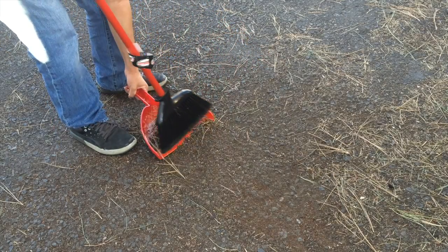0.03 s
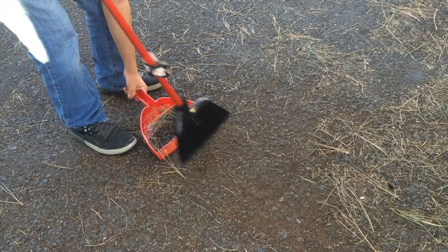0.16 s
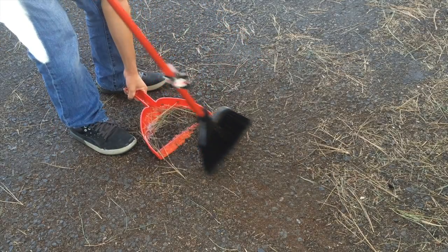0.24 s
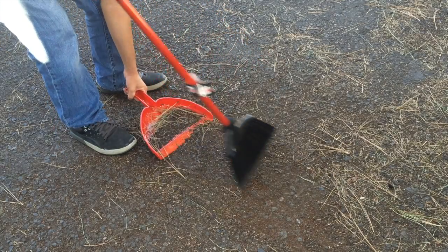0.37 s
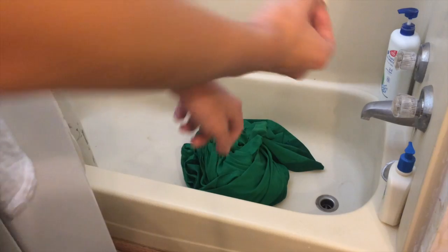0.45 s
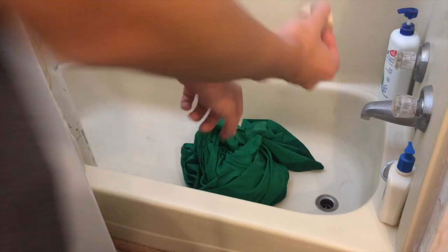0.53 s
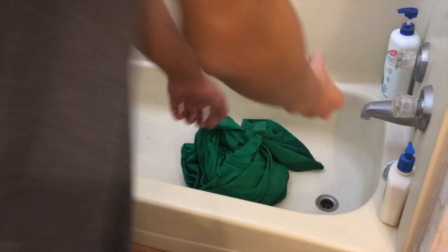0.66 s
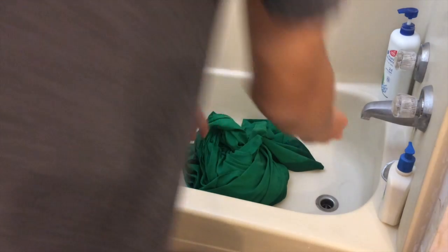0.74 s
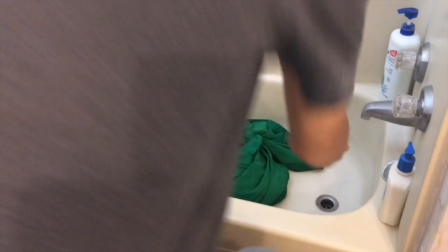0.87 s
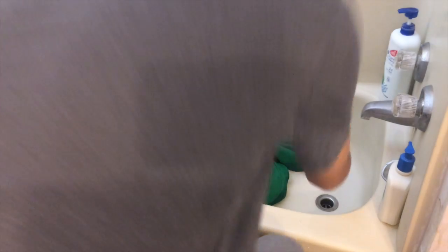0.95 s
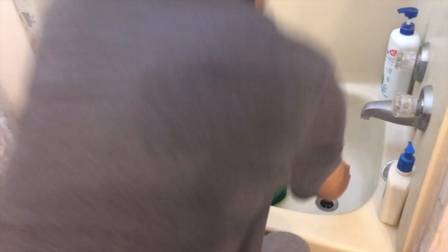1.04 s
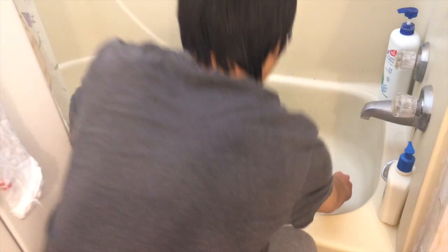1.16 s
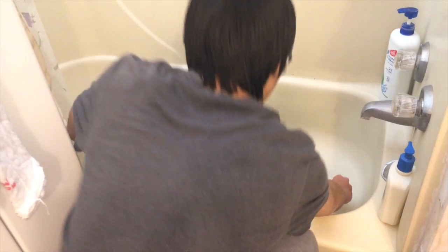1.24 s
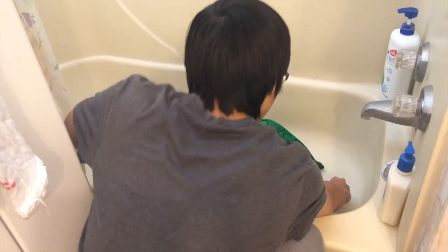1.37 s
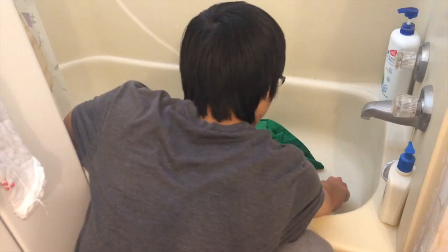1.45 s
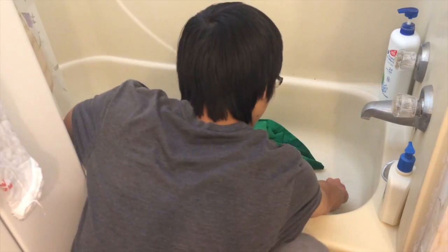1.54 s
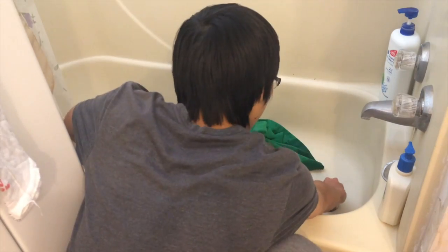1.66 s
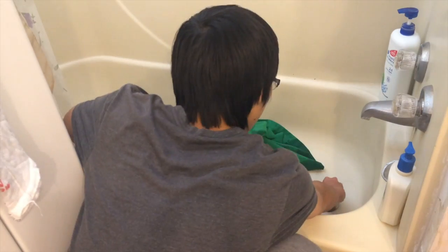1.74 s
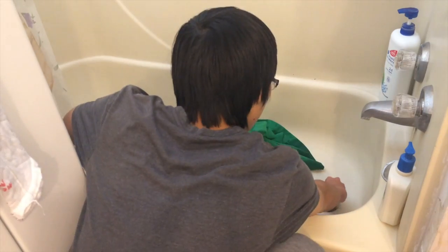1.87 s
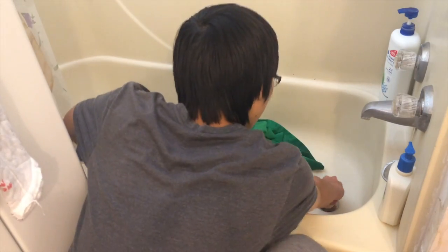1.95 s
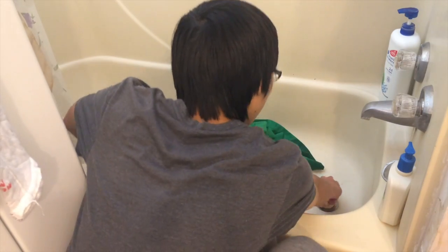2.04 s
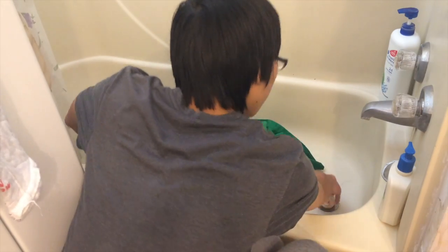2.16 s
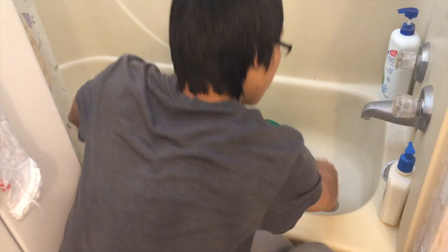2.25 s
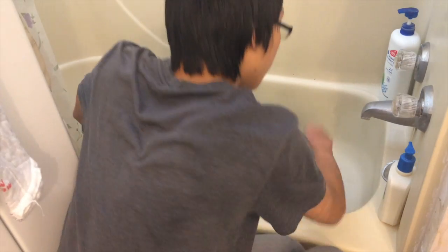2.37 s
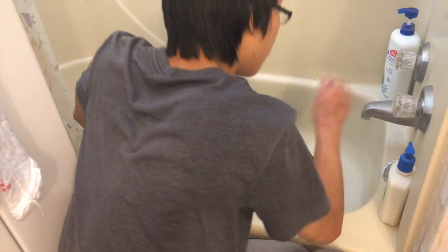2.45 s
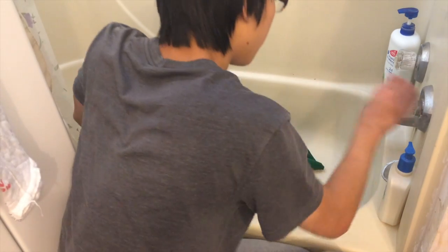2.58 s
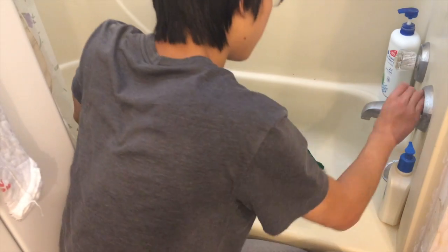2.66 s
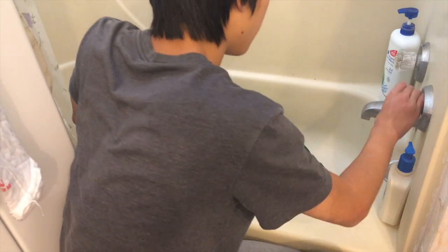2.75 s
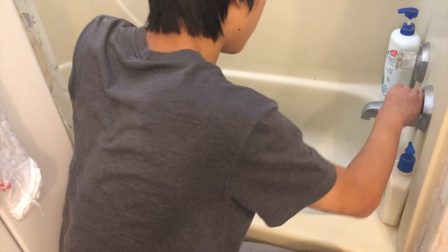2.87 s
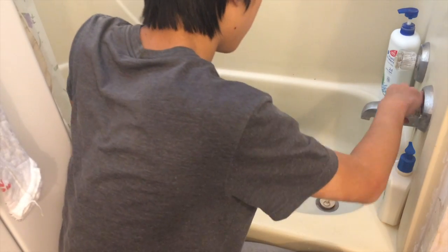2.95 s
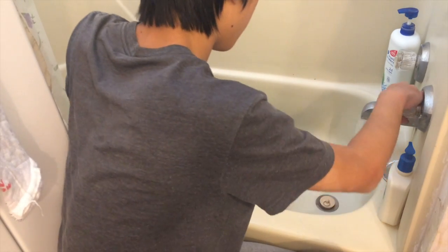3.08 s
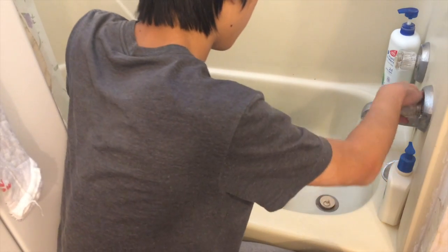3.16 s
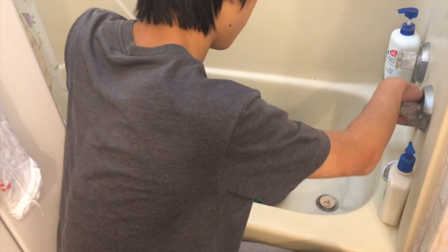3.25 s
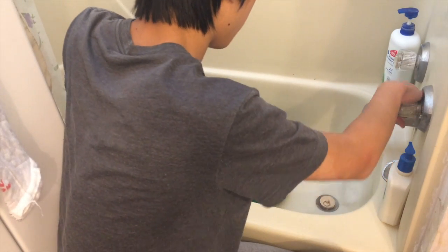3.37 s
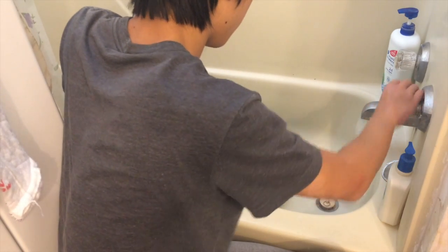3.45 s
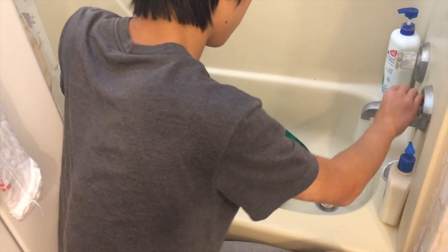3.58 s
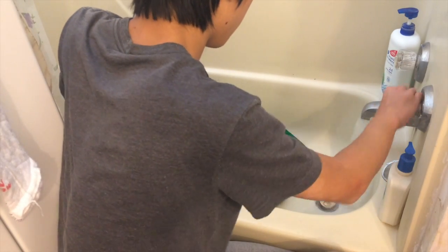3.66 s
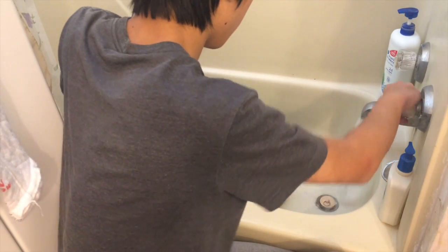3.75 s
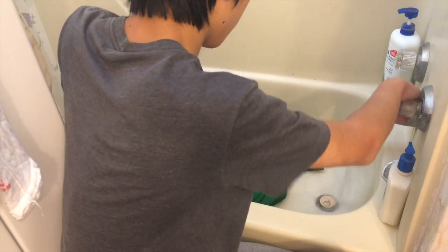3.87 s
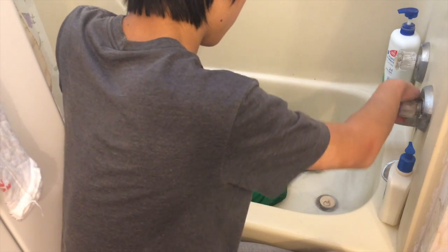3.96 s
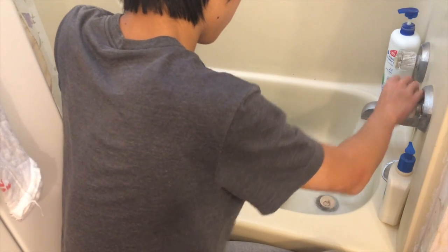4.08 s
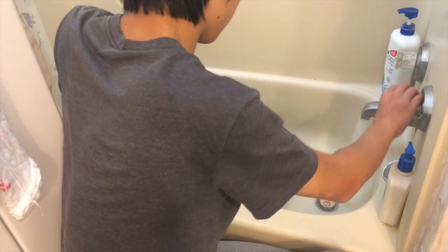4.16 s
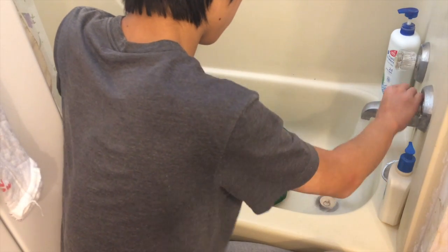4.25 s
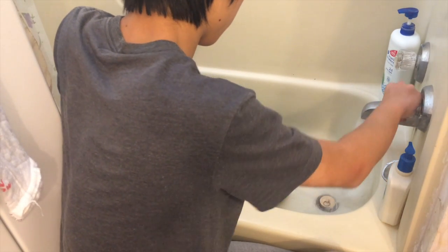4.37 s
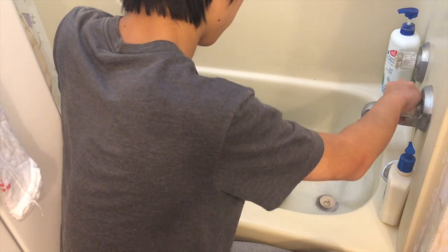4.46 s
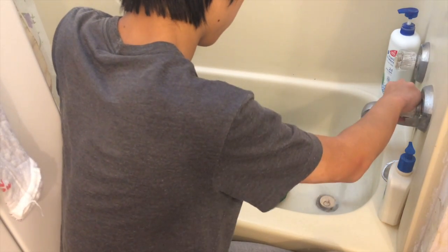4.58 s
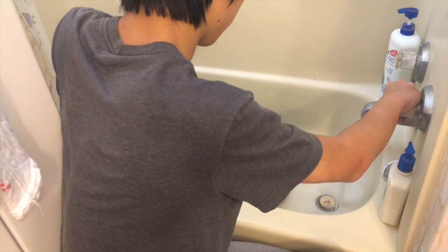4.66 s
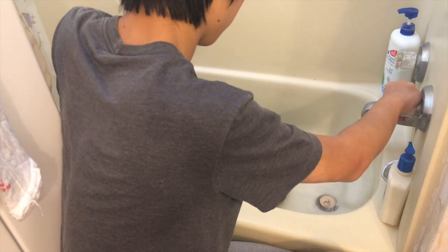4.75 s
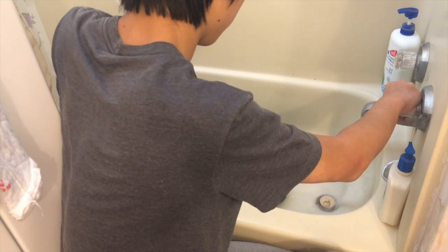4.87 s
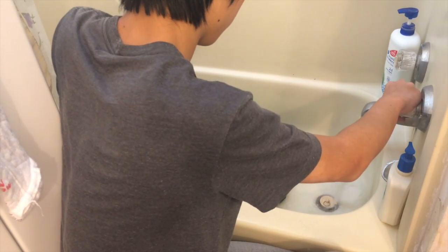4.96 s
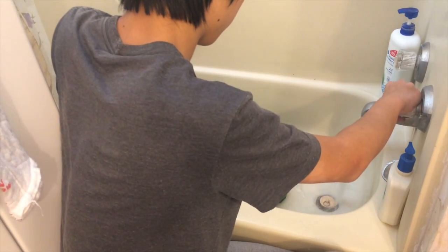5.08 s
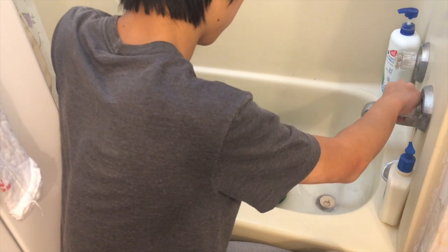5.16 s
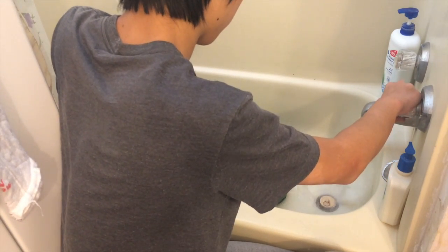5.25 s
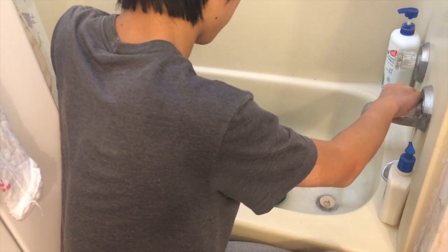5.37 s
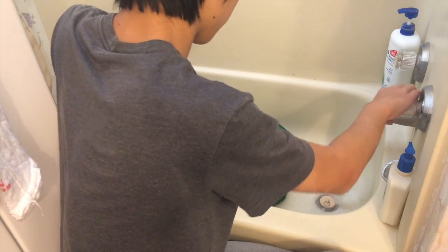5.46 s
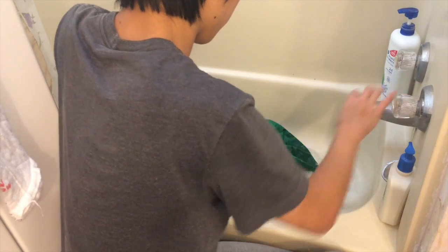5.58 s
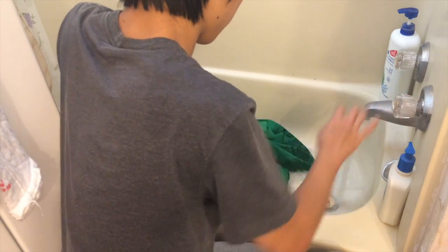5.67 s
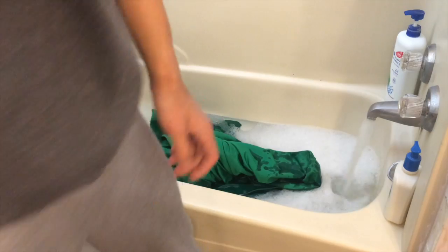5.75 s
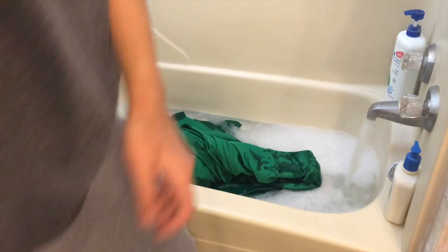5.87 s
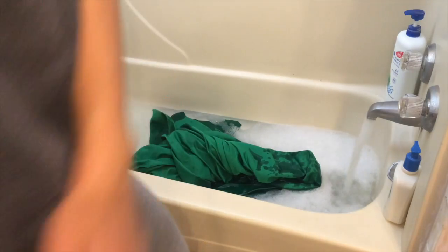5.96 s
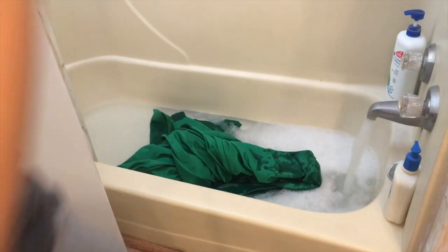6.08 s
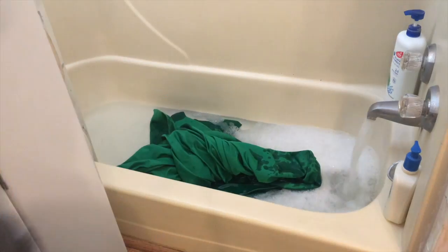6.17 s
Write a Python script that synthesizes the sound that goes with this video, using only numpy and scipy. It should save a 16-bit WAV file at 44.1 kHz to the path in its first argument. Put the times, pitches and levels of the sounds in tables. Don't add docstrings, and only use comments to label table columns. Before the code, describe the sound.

After a last broom scrape outdoors, a tub plug snaps sharply, then a tap hisses, whines, coughs air and gushes before softening into foam.

```python
import sys
import numpy as np
from scipy import signal
from scipy.fft import rfft
from scipy.io import wavfile
from scipy.ndimage import uniform_filter1d

SR = 44100
rng = np.random.default_rng(int(sys.argv[2]) if len(sys.argv) > 2 else 0)


def nominal_scale(level):
    x = np.asarray(level, float) / 20
    return 10 ** x


def unload_wav(signal):
    wavfile.write(
        sys.argv[1],
        SR,
        np.round(np.clip(np.atleast_2d(signal).T, -1, 1) * 32767).astype(np.int16),
    )


N = 274302
T = np.arange(N) / SR

INDOORS_S, HALF_FULL_S = .488, 5.787
YARD_DB, ROOM_DB = -49.5, -59.5
PLUG_S, PLUG_DB, PLUG_HZ = 1.5176, -10, 1720
CRACK_S, WIDE_S = 2.866, 3.74
WHINE_HZ, WHINE_CLIMB_HZ_PER_S = 1393, 167
BURST_S = .0036
JET_HZ, JET_CLIMB_HZ_PER_S = 6130, 3700
HISS_DB, LIFT_DB, LIFT_S, WIDE_DB, WIDENING_S = -36, -41, 0.036, -14.5, 0.048
EMPTY_HZ, FULL_HZ, FILL_S = 600, 462.4, .035
LANDS_S, STREAM_DB = 3.325, -37.5
TRICKLE_DB, BOOM_DB, SHALLOW_DB, DEEPEN_S, CUSHION_DB_PER_S = -56, -40.5, -11.5, 0.58, -2
WALLS_DB = -43.5
SUDS_DB, POUR_DB = -62, -47.5

# frequency in Hz, density in dB per Hz.
YARD_COLOUR = [(18, -47), (30, -17), (102, -1.5), (320, -22), (364, -12.5), (415, -19), (978, -21),
               (2370, -39.5), (15000, -52)]
# frequency in Hz, density in dB per Hz.
SCRAPE_COLOUR = [(800, 3.0), (2000, 2), (6000, -10.5), (15000, -24)]
# start in seconds, peak level in dB, pitch in Hz.
BRISTLES = [
    (.0095, -48, 6500),
    (0.0317, -33, 1640),
    (0.0345, -34, 1500),
    (.0645, -44, 3200),
    (0.084, -38, 3420),
    (.107, -50, 4500),
    (.112, -45, 4400),
    (.124, -50, 3200),
    (0.186, -37, 1800),
    (.2065, -51, 3100),
]
# time in seconds, scrape level in dB.
SWEEP = [(.004, -56), (.03, -62), (.033, -51.5), (.055, -57.5), (0.125, -60), (0.14, -70), (0.185, -70),
         (0.188, -46), (0.194, -71), (0.24, -76)]
# frequency in Hz, density in dB per Hz.
ROOM_COLOUR = [(15, -37), (25, -28), (54, 1.5), (96, -6), (128, -0.5), (244, -6), (441, -8), (659, -15),
               (754, -14), (1040, -19.5), (1320, -17), (1980, -21.5), (2880, -22.5), (15200, -35.5)]
# frequency in Hz, density in dB per Hz.
CLOTH_COLOUR = [(200, -3.5), (450, -5), (1200, -7), (2500, -16), (5000, -21.5), (8000, -24), (15300, -49)]
# peak in seconds, level in dB, swell, t60 and hold in seconds.
RUSTLES = [(.493, -53, .004, 0.8, 0.015), (.5, -55.5, .01, 0.31, 0.17), (1.0, -62.5, 0.51, 1.4, 0.23),
           (1.012, -48, .012, .22, .0), (1.505, -49.5, .008, .35, 0.025), (1.679, -50, 0.057, 0.4, .0),
           (2.349, -68, .12, .4, 0.017), (2.517, -63, 0.14, 1.8, 0.0025), (2.72, -59, 0.24, 0.35, .0),
           (2.749, -55, 0.036, 0.26, .0), (2.83, -60, .04, .3, 0.058)]
# frequency in Hz, width in Hz, level in dB.
SHELL = [(102.4, 5.7, -6.5), (167, 26.4, 4), (315.7, 6.8, 0), (425, 65, 0), (468, 10, -9),
         (671.6, 7.5, -2.5), (983, 22, -6)]
# peak in seconds, level in dB, swell and t60 in seconds.
RUBS = [(.498, -48, .008, 0.46), (.774, -58, .04, .12), (1.012, -55.5, 0.18, 1.2), (1.422, -43, 0.012, 0.2),
        (1.47, -47, .03, 0.44), (1.505, -42, .007, .05), (1.647, -46.5, 0.021, 0.91),
        (2.237, -51, 0.016, 0.048), (2.279, -57, .02, 0.12), (2.715, -64, 0.29, .4),
        (2.749, -47, 0.041, 0.29)]
# start in seconds, peak level in dB, pitch in Hz, t60 in seconds.
BUMPS = [(.54, -59, 45, 0.18), (1.011, -37.5, 47, 0.068), (1.195, -38.5, 179, 0.061),
         (1.25, -49.5, 173, 0.14), (1.421, -30, 430, 0.038), (1.433, -34, 316, 0.059),
         (1.456, -31.5, 162, 0.058), (1.472, -38, 76, 0.16), (1.516, -38, 100, 0.069),
         (1.531, -38, 434, 0.048), (1.643, -32.5, 405, 0.052), (1.654, -31.5, 263, 0.063),
         (1.675, -30.5, 191, 0.065), (1.702, -34.5, 210, 0.04), (1.731, -47, 254, .05),
         (1.755, -33.5, 184, 0.066), (2.722, -38, 152, 0.058), (2.74, -47, 303, 0.064),
         (2.745, -48, 520, .07), (2.749, -45, 172, .1)]
# start in seconds, peak level in dB, body pitch in Hz, edge level in dB.
TICKS = [(.490, -54, 2300, -54), (1.007, -50, 1980, -54), (1.423, -56, 2500, -63), (1.642, -52, 1300, -62),
         (2.740, -57, 2000, -48), (4.034, -29.5, 2330, -38), (4.13, -29, 2300, -40), (5.97, -62, 3000, -50),
         (6.038, -49, 4480, -39), (6.112, -57, 5500, -41), (6.205, -58, 5007, -40)]
# frequency in Hz, level in dB, t60 in seconds.
PLUG_RING = [(805, -25, 0.18), (980, -12, 0.076), (1110, -15, 0.092), (1297, 1, 0.12), (1505, 0, 0.17),
             (1480, -11, 0.11), (1809, -22, 0.1), (2110, 6.5, 0.073), (2283, -4, 0.1), (2480, -8, 0.1),
             (3270, -5.5, 0.065), (4400, -13.5, 0.083)]
# frequency in Hz, density in dB per Hz.
HISS_COLOUR = [(410, -7.5), (700, -9), (1200, -13.5), (1400, 0), (1620, -8.5), (1990, -16), (2200, -19),
               (2380, -23), (2780, -23), (3690, -16), (4830, -18), (7490, -13), (15200, -31)]
# frequency in Hz, width in Hz, level in dB.
PIPE = [(2470, 110, 5.5), (2990, 60, 2.5), (3690, 36, 0), (4110, 45, -1), (4590, 30, -12), (5290, 120, -4),
        (6250, 100, 3), (6610, 28, 3), (7290, 41, -2.5), (7800, 65, 0), (8030, 50, -2), (8660, 150, -4)]
# time in seconds, whine level in dB.
WHINE_LEVEL = [(2.86, -66), (2.9, -50), (2.94, -42), (3.014, -31.5), (3.09, -21.5), (3.25, -25.5),
               (3.65, -18), (3.72, -25), (3.77, -27), (3.856, -31), (4.0, -41)]
# frequency in Hz, width in Hz, level in dB.
SIDE_PIPES = [(1728, 20, 3.5), (1922, 9.5, -1)]
# peak in seconds, peak level in dB, pitch in Hz.
WHINE_BURSTS = [(3.06, -22.4, 1430), (3.0745, -23.9, 1420), (3.0863, -23.0, 1400), (3.1175, -35, 1460),
                (3.1287, -27, 1440), (3.1387, -24.9, 1450), (3.1468, -25, 1431), (3.1628, -24, 1410),
                (3.1783, -26, 1410), (3.1931, -27, 1410), (3.2011, -23.8, 1452), (3.2148, -22, 1425),
                (3.234, -27.3, 1499), (3.2416, -22, 1470), (3.249, -22, 1409), (3.2707, -20, 1440),
                (3.2829, -18, 1429), (3.2988, -21, 1470), (3.3077, -24, 1380), (3.3183, -18.5, 1420),
                (3.3451, -24, 1500), (3.3596, -18.6, 1439), (3.3702, -22.0, 1440), (3.3822, -23, 1494),
                (3.3979, -19.5, 1440), (3.413, -17, 1475), (3.4258, -19.1, 1500), (3.435, -17.2, 1430),
                (3.4449, -18, 1430), (3.456, -27, 1564), (3.4672, -17, 1456), (3.4772, -15.5, 1460),
                (3.4854, -16.5, 1432), (3.5029, -23.4, 1566), (3.5206, -16.5, 1502), (3.534, -22.3, 1510),
                (3.5406, -24.5, 1498), (3.554, -22, 1610), (3.5703, -19.5, 1574), (3.5785, -18.5, 1526),
                (3.5953, -19, 1505), (3.6158, -22, 1543), (3.6231, -19, 1519), (3.6346, -24, 1600),
                (3.6454, -19.9, 1491), (3.6537, -19.8, 1509), (3.664, -19.5, 1511), (3.676, -13.7, 1496),
                (3.6836, -14, 1469), (3.6986, -13.5, 1480), (3.712, -20.5, 1472), (3.7274, -26.7, 1470),
                (3.7396, -25.0, 1541), (3.751, -12, 1530), (3.7701, -22, 1510), (3.7778, -27, 1519),
                (3.7897, -25, 1586), (3.81, -24, 1530)]
# start in seconds, peak level in dB, pitch in Hz, t60 in seconds.
KNOCKS = [
    (2.865, -48, 1494, 0.25),
    (2.865, -50, 745, 0.091),
    (2.9632, -19, 587, 0.044),
    (2.9632, -28, 498, 0.067),
    (2.9632, -36, 840, 0.026),
    (2.9634, -37, 340, 0.071),
    (2.974, -29, 600, 0.08),
    (3.07, -35, 325, .12),
    (3.066, -39, 680, .08),
]
# peak in seconds, level in dB, swell, t60 and hold in seconds.
COUGHS = [
    (2.985, -35.5, 0.012, 0.17, 0.017),
    (3.049, -30.5, 0.012, 0.11, 0.038),
    (3.118, -40, .012, 0.15, 0.015),
    (3.354, -39.5, 0.022, 0.18, 0.024),
    (3.686, -38.5, .02, 0.19, 0.022),
    (3.75, -42, .015, .2, 0.013),
]
# peak in seconds, level in dB, swell, t60 and hold in seconds.
WHOOSH = (2.925, -42, .04, .7, .12)
# frequency in Hz, density in dB per Hz.
WHOOSH_COLOUR = [(1500, -25), (2500, -2), (3400, -8), (4200, 2), (4700, -6), (5300, -5), (7000, -30)]
# peak in seconds, level in dB, swell and t60 in seconds.
SLAPS = [
    (3.08, -36, 0.089, 0.31),
    (3.25, -35, 0.24, 0.28),
    (3.45, -52, .1, 1.3),
]
# frequency in Hz, density in dB per Hz.
SPLASH_COLOUR = [(20, -50), (60, -18.5), (160, -15), (220, -40), (500, -13), (800, -15.5), (1150, -16),
                 (1500, -8), (2300, -13), (3500, -12), (7700, -15.5), (10000, -23.5), (13000, -26),
                 (15300, -37)]
# centre in seconds, change in dB, width in seconds.
SURGES = [
    (3.6, 1, .1),
    (3.765, 2, 0.038),
    (3.865, -3, 0.02),
    (3.95, 3, 0.034),
    (4.045, 2.5, .03),
    (4.135, 2, 0.037),
    (5.64, -0.5, 0.026),
    (5.72, 0.5, 0.13),
]
# peak in seconds, level in dB, ring in Hz.
SPLATS = [(3.33, -47, 2870), (3.4, -44, 10800), (3.4, -40.5, 4000), (3.46, -39, 4400), (3.49, -39, 3900),
          (3.765, -39, 3080), (3.905, -35.5, 1930), (3.955, -36, 1920), (4.128, -36, 2490),
          (4.33, -40, 1860), (4.33, -42, 2200), (4.585, -47, 1640), (4.61, -37, 1920), (4.7, -41, 2330),
          (4.895, -41, 1820), (4.895, -42, 2550), (5.265, -42, 2250), (5.375, -47, 2300), (5.45, -41, 1850),
          (5.48, -41, 1950), (5.705, -41, 2110), (5.77, -41, 1900)]
# frequency in Hz, width in Hz, level in dB.
SPOUT = [(1416, 44, 11), (1524, 45, 18.5), (1640, 60, 1), (1930, 40, 6), (2310, 62, 9), (2510, 34, -1)]
# peak in seconds, level in dB, swell, t60 and hold in seconds.
SONGS = [
    (3.9, -44, 0.12, 1.5, 0.46),
    (4.45, -43.5, 0.13, 4, 0.29),
    (4.95, -36.5, 0.13, 1.7, 0.14),
    (5.37, -37.5, 0.21, .45, 0.19),
    (5.72, -52, .1, 1.5, .0),
]
# frequency in Hz, density in dB per Hz.
FOAM_COLOUR = [(18, -60), (30, -32), (64, -35), (97, -18), (181, 0), (268, -18), (500, -15.5), (667, -13.5),
               (1150, -19), (1620, -6.5), (1840, -14), (3500, -21.5), (7920, -29.5), (15200, -44)]
# peak in seconds, level in dB, swell and t60 in seconds.
FIZZES = [
    (5.81, -53, .02, .12),
    (5.89, -47.5, 0.033, .15),
    (5.97, -55, .01, .06),
    (6.012, -49, .025, .12),
    (6.05, -48, 0.02, 0.13),
    (6.16, -51, .02, .12),
    (6.22, -55, 0.03, .1),
]


def evened(x):
    return x / np.sqrt(np.mean(x ** 2) + 1e-20)


def follow(rows, k, rise=0.019, fall=0.016):
    columns = np.transpose(rows)
    s = columns[0]
    edges = np.clip((T - s[0]) / rise + 1, 0, 1) * np.clip((s[-1] - T) / fall + 1, 0, 1)
    return nominal_scale(np.interp(T, s, columns[k])) * edges


def stroke(s, db, swell, t60, hold=0):
    after = np.maximum(T - s - hold, 0)
    return np.clip((T - s) / max(swell, 1e-3) + 1, 0, 1) ** 2 * nominal_scale(db - 60 * after / max(t60, 1e-2))


def strokes(rows):
    return np.sqrt(sum(stroke(*row) ** 2 for row in rows))


def since(s, rise):
    return np.clip((T - s) / rise + 1, 0, 1)


def band_rms(x, lo_hz, hi_hz):
    hz = np.fft.rfftfreq(len(x), 1 / SR)
    band = rfft(x)[(hz > lo_hz) & (hz < hi_hz)]
    return np.sqrt(2 * np.sum(abs(band) ** 2)) / len(x)


def noise(points, patchy_db=1.5, flicker_db=1.0, size=512):
    frames, hz = 4 * N // size + 5, np.fft.rfftfreq(size, 1 / SR)
    a, b, patches = rng.standard_normal((frames, len(hz), 3)).T
    patches = uniform_filter1d(patches, size=7, axis=0)
    patches = evened(uniform_filter1d(patches, size=20, axis=1))
    flicker = evened(uniform_filter1d(rng.standard_normal(frames), size=5))
    f, db = np.transpose(points)
    colour = np.interp(np.log(hz + 1), np.log(f), db)[:, None]
    z = (a + 1j * b) * nominal_scale(colour + patchy_db * patches + flicker_db * flicker)
    return evened(signal.istft(z, nperseg=size, noverlap=3 * size // 4)[1][:N])


def resonate(x, hz, width):
    turn = np.exp(2j * np.pi * np.cumsum(hz * np.ones(N)) / SR)
    r = np.exp(-np.pi * width / SR)
    return 2 * (turn * signal.lfilter([1 - r], [1, -r], x / turn)).real


def body(x, modes):
    return evened(sum(nominal_scale(db) * evened(resonate(x, hz, width)) for hz, width, db in modes))


def lumps(smooth_s, depth_db):
    size = max(round(smooth_s * SR), 2)
    drift = uniform_filter1d(uniform_filter1d(rng.standard_normal(N), size), size)
    return evened(nominal_scale(depth_db * evened(drift)))


def wavering(x, modes, smooth_s, depth_db, drift):
    return evened(sum(nominal_scale(db) * lumps(smooth_s, depth_db) * evened(resonate(x, hz * lumps(smooth_s, drift), width))
                      for hz, width, db in modes))


def add(mix, s, db, hz, t60, rise=0.0007):
    start = round(s * SR)
    t = np.arange(min(round(t60 * SR), N - start)) / SR
    ring = np.sin(2 * np.pi * hz * t) * np.minimum(t / rise, 1)
    mix[start:][:len(t)] += nominal_scale(db - 60 * t / t60) * ring


def blob(s, db, hz, width):
    t = np.arange(-3 * width, 3 * width, 1 / SR)
    return round((s - 3 * width) * SR), nominal_scale(db) * np.exp(-(t / width) ** 2) * np.cos(2 * np.pi * hz * t)


def walls(x, t60):
    taps = np.zeros(SR // 2)
    at = np.arange(60, len(taps) - 20, 20)
    taps[at + rng.integers(0, 20, len(at))] = rng.choice([-1., 1.], len(at))
    taps *= nominal_scale(-60 * T[:len(taps)] / t60)
    return signal.oaconvolve(x, taps / np.linalg.norm(taps))[:N]


def bubbles(per_s, lo_hz, hi_hz, cycles, spread_db, count=24):
    size = nominal_scale(spread_db * np.minimum(rng.exponential(1, N), 5)) * (rng.random(N) < per_s / SR)
    which, out = rng.integers(0, count, N), np.zeros(N)
    for k, hz in enumerate(np.geomspace(lo_hz, hi_hz, count)):
        turns = np.arange(round(3 * cycles * SR / hz)) * hz / SR
        chirp = np.sin(2 * np.pi * turns * (1 + 0.077 * turns / cycles))
        chirp = chirp * np.exp(-turns / cycles * 2) * np.minimum(turns, 1)
        out += signal.oaconvolve(size * (which == k), chirp)[:N]
    return evened(out)


def yard():
    grit = np.zeros(N)
    for s, db, hz in BRISTLES:
        add(grit, s, db, hz, .007, .0002)
        add(grit, s, db - 10, hz * 1.74, .005, .0002)
        add(grit, s, db - 8.5, 6500, .005, .0002)
    grit = grit + nominal_scale(-7) * walls(grit, .06)
    scrape = noise(SCRAPE_COLOUR, 1.6, 1.7, size=256) * follow(SWEEP, 1, .002)
    return nominal_scale(YARD_DB) * noise(YARD_COLOUR, 0.74, 0.97, size=1024) + grit + nominal_scale(3.0) * scrape


def bather():
    rustle = noise(CLOTH_COLOUR, 1.5, 0.52, size=256)
    rustle = rustle / band_rms(rustle, 720, 9000) * strokes(RUSTLES)
    rub = body(lumps(0.0041, 3.6) * rng.standard_normal(N), SHELL) * strokes(RUBS)
    bumps, ticks = np.zeros((2, N))
    for s, db, hz, t60 in BUMPS:
        add(bumps, s, db, hz, t60, .004)
        add(bumps, s, db + 1.5, hz * 1.38, t60 * 0.23, .002)
    for s, db, hz, edge_db in TICKS:
        add(ticks, s, db + 16.0, hz, .003, .0001)
        add(ticks, s, edge_db + 4.5, 7500, .0018, .0001)
        add(ticks, s, edge_db - 1, 11500, .0015, .0001)
    ticks = ticks + nominal_scale(-3) * walls(ticks, .07)
    return nominal_scale(-3.5) * rustle + nominal_scale(-3.0) * rub + bumps + nominal_scale(1.5) * walls(bumps, 0.26) + ticks


def drain_plug():
    snap, ring = np.zeros((2, N))
    add(snap, PLUG_S + .0002, PLUG_DB + 10.5, PLUG_HZ, .0042, .0007)
    add(snap, PLUG_S, PLUG_DB - 5.5, 1050, .006, .0007)
    add(snap, PLUG_S + 0.00018, PLUG_DB - 12.5, 3600, .004, .0002)
    add(snap, PLUG_S + 0.00015, PLUG_DB - 26, 7200, .0008, .00005)
    for hz, db, t60 in PLUG_RING:
        add(ring, PLUG_S + 0.0011, PLUG_DB - 23 + db, hz, t60)
    add(ring, PLUG_S + 0.013, PLUG_DB - 7.0, 1450, .03, .0015)
    echoes = nominal_scale(-1) * walls(snap, .15) + nominal_scale(-22) * walls(snap, .4)
    return ring + echoes - snap


def valve_hiss():
    jet = noise(HISS_COLOUR, 1.4, .5, size=256)
    jet = jet + nominal_scale(-7) * wavering(jet, PIPE, 0.044, 4.1, 0.064)
    jet = signal.lfilter(*signal.butter(3, 520, "high", fs=SR), jet)
    first_s = COUGHS[0][0]
    tone_hz = JET_HZ + JET_CLIMB_HZ_PER_S * (np.clip(T, first_s, LANDS_S) - first_s)
    jet = jet + nominal_scale(-14.0) * evened(resonate(jet, tone_hz, 900))
    lifting_db = LIFT_DB * np.exp(-np.maximum(T - CRACK_S, 0) / LIFT_S)
    wide_db = WIDE_DB * since(WIDE_S + WIDENING_S, WIDENING_S)
    return jet / band_rms(jet, 5600, 8140) * nominal_scale(HISS_DB + lifting_db + wide_db) * since(CRACK_S, .03)


def valve_whine():
    voids = rng.standard_normal(N)
    centre = WHINE_HZ + WHINE_CLIMB_HZ_PER_S * (np.clip(T, CRACK_S, WIDE_S) - CRACK_S)
    whine = evened(resonate(resonate(voids, centre, 146), centre, 230))
    strength = follow(WHINE_LEVEL, 1, 0.0046, .05) * np.clip((3.9 - T) / 0.083, 0, 1)
    branches = body(voids, SIDE_PIPES) * uniform_filter1d(strength, size=3000)
    whine = nominal_scale(-13.5) * whine * strength + nominal_scale(-15.0) * branches
    for s, db, hz in WHINE_BURSTS:
        start, tone = blob(s, db - 0.3, hz, BURST_S)
        whine[start:start + len(tone)] += tone
    for s, db, hz, t60 in KNOCKS:
        add(whine, s, db, hz, t60, .0015)
    return whine


def cough():
    air_hz = FULL_HZ + (EMPTY_HZ - FULL_HZ) * np.exp(-np.maximum(T - COUGHS[0][0], 0) / FILL_S)
    wobble_hz = 12 * evened(uniform_filter1d(rng.standard_normal(N), size=300))
    hum = np.sin(2 * np.pi * np.cumsum(air_hz + wobble_hz) / SR) * lumps(0.0073, 0.75)
    hum = hum + nominal_scale(-10.5) * evened(resonate(rng.standard_normal(N), air_hz, 84))
    whoosh = noise(WHOOSH_COLOUR, 2.4, 1, size=256)
    return evened(hum) * strokes(COUGHS) + whoosh * stroke(*WHOOSH)


def drumming():
    wet = np.maximum(T - LANDS_S, 0)
    first = since(COUGHS[0][0], .004)
    boom_db = BOOM_DB + SHALLOW_DB * np.exp(-wet / DEEPEN_S) + CUSHION_DB_PER_S * wet
    weight = nominal_scale(TRICKLE_DB) * first + nominal_scale(boom_db) * since(LANDS_S, 0.013)
    boom = body(lumps(0.041, 0.8) * rng.standard_normal(N), SHELL[:2]) * weight
    wall_level = strokes(SLAPS) * first + nominal_scale(WALLS_DB) * since(LANDS_S + 0.17, .3)
    hum = body(lumps(0.028, 2.1) * rng.standard_normal(N), SHELL[2:]) * wall_level
    boom = signal.lfilter(*signal.butter(2, 70, "high", fs=SR), boom)
    return boom + signal.lfilter(*signal.butter(2, 230, "high", fs=SR), hum)


def stream():
    wash = noise(SPLASH_COLOUR, 1.7, 1.1)
    spray = wash + nominal_scale(-8) * bubbles(3000, 1500, 9000, 4, 3.5)
    spray = spray + nominal_scale(-11) * bubbles(200, 1300, 3000, 12, 3)
    surge_db = sum(db * np.exp(-((T - s) / width) ** 2) for s, db, width in SURGES)
    spray = spray / band_rms(spray, 2200, 5500) * nominal_scale(STREAM_DB + surge_db) * since(LANDS_S, .0055)
    song = wavering(lumps(0.0092, 2.1) * rng.standard_normal(N), SPOUT, .06, 2.1, .1) * strokes(SONGS)
    smack = sum(evened(resonate(wash, hz, 0.096 * hz)) * stroke(s, db, 0.0069, 0.12) for s, db, hz in SPLATS)
    return smack + nominal_scale(-0.5) * spray + nominal_scale(-4.0) * song


def foam():
    pour = noise(FOAM_COLOUR, 1.5, 1.2)
    pour = pour + nominal_scale(-6.0) * body(rng.standard_normal(N), SHELL)
    pour = pour + nominal_scale(-28) * body(rng.standard_normal(N), SPOUT)
    fizz = bubbles(9000, 3000, 12000, 4, 2)
    fizz = signal.lfilter(*signal.butter(2, 11500, fs=SR), fizz)
    return nominal_scale(0.5) * evened(pour) * nominal_scale(POUR_DB) + nominal_scale(-5.5) * fizz * (nominal_scale(SUDS_DB) + strokes(FIZZES))


def scene():
    indoors = np.clip((T - INDOORS_S) / 0.0053, 0, 1)
    late = np.clip((T - HALF_FULL_S) / 0.023 + .5, 0, 1)
    room = nominal_scale(ROOM_DB) * noise(ROOM_COLOUR, 2.36, 0.93, size=2048)
    water = nominal_scale(-2) * valve_hiss() + valve_whine() + cough() + stream()
    water = water + nominal_scale(-11) * walls(water, .2) + drumming()
    bath = (room + water) * (1 - late) + foam() * late + bather() + drain_plug()
    mono = yard() * (1 - indoors) + bath * indoors
    return np.array([mono, mono])


def top_cut(x):
    return signal.sosfilt(signal.butter(12, 15380, fs=SR, output="sos"), x)


def record(dry):
    edge = signal.firwin(401, 15330, window=("kaiser", 10), fs=SR)
    mix = signal.oaconvolve(dry, edge[None], "same")
    return top_cut(mix)


dry = scene()
out = record(dry)
unload_wav(out)
```